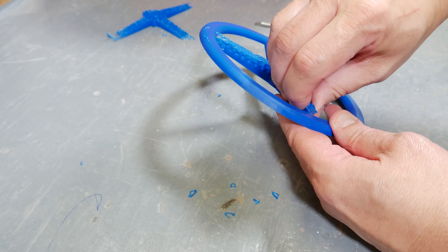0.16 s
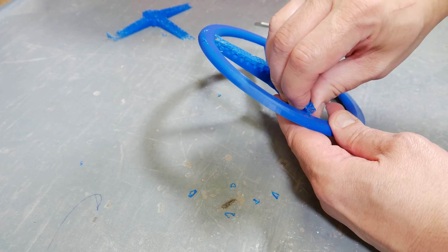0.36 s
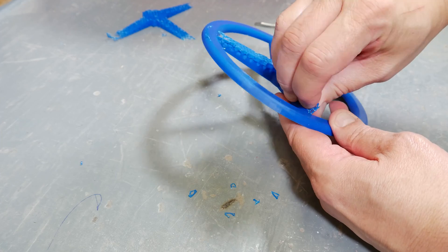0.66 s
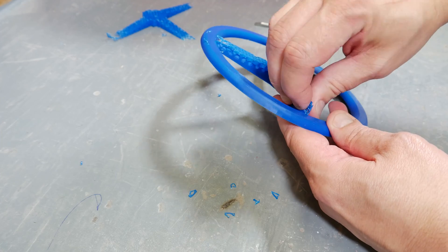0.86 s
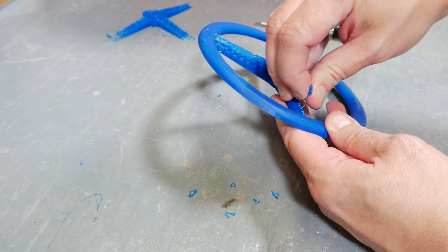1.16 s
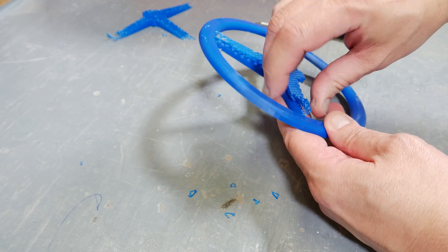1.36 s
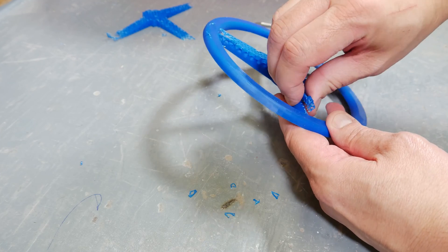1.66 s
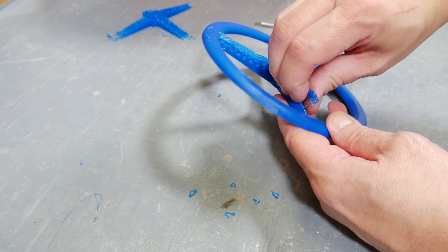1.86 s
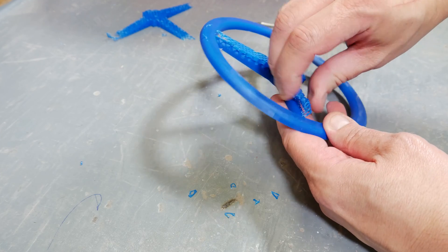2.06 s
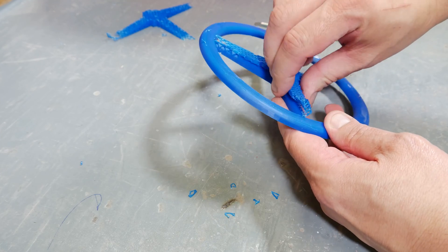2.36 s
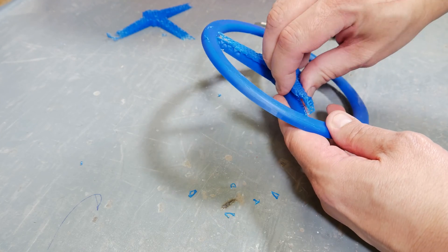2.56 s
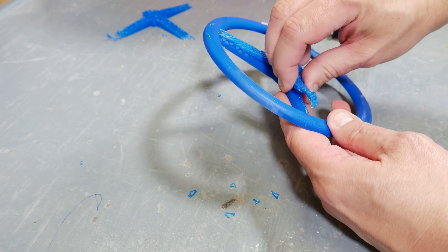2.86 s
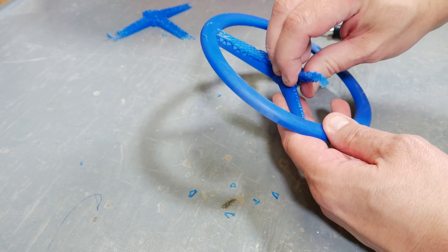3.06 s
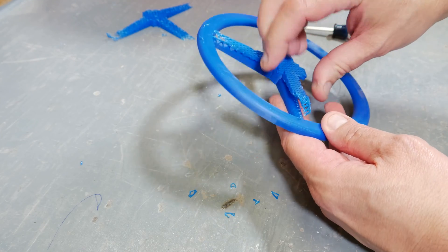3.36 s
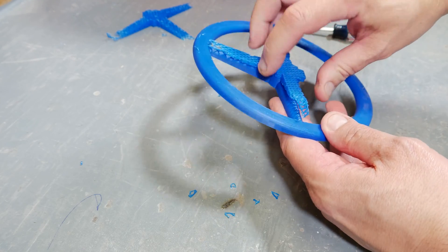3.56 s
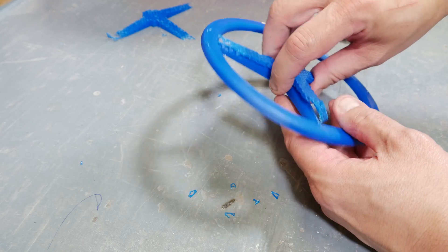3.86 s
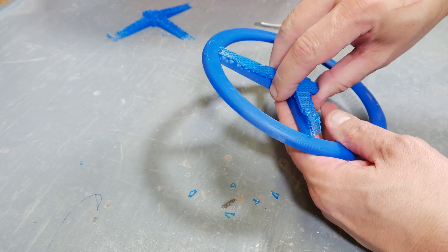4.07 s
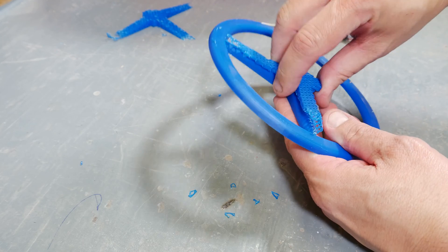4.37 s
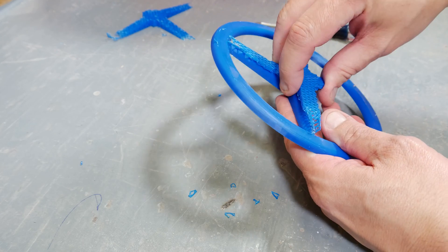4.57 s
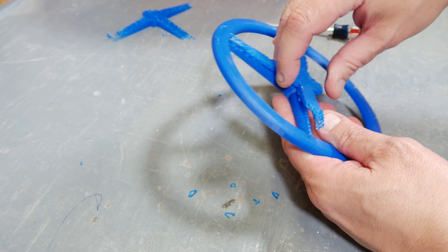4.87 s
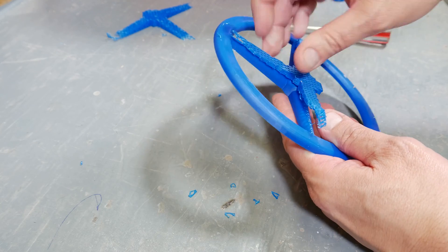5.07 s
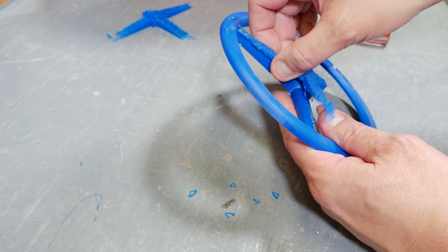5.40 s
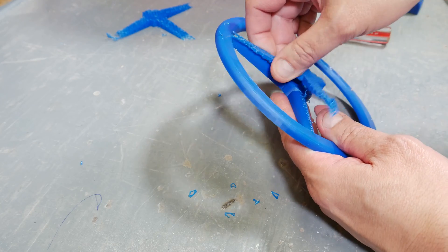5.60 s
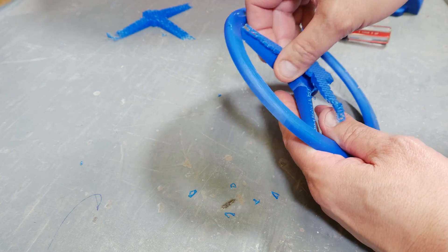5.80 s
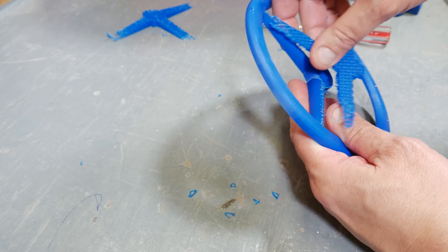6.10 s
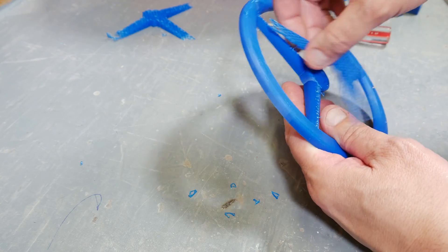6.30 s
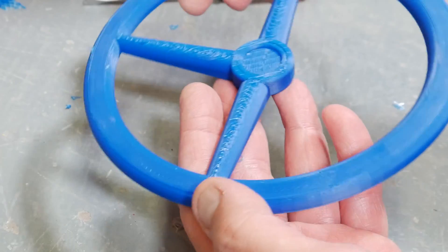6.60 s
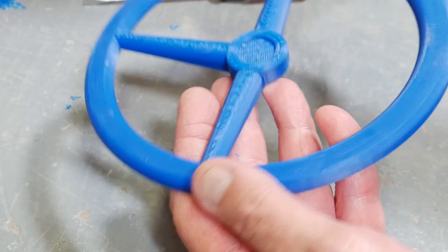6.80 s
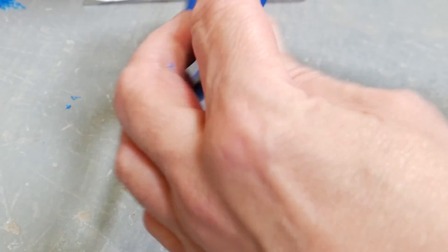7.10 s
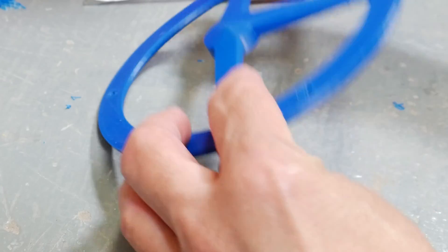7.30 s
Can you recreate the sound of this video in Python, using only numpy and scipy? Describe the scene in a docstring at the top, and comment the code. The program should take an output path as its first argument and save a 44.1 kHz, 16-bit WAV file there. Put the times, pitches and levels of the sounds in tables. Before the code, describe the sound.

A close microphone catches fingers prying printed plastic lattice from a light wheel. Irregular bright snaps and brief tearing crackles, each with a tiny plastic ring and soft thud in the hand, are separated by quiet handling. Densest bursts fall around three and four seconds. Last comes a loud clack on the bench and a few quick bounces, with short room echoes.

```python
"""Sharp cracks, singly and in bursts, as brittle printed lattice is pried off a small plastic wheel by hand.
Each crack is a quick run of tiny fractures that rings the broken strut and the wheel, with a soft thud in the hand.
Between them come nail clicks, faint ticks and rubbing fingers, made of shorter cracks and grainy noise.
At the end the wheel is put down on the bench with a knock and a short rattle: a clack plus decaying modes.
A brief dull bump opens the scene; low rumble, faint hums and hiss lie behind it, and a small workshop echoes."""
import sys
import numpy as np
from scipy import signal
from scipy.fft import rfft, irfft
from scipy.io import wavfile

SR = 44100
rng = np.random.default_rng(int(sys.argv[2]) if len(sys.argv) > 2 else 0)


def inscribe(sig):
    """Save sig as 16-bit PCM at rate SR to the path in sys.argv[1].

    A 1-D sig is mono; a 2-D sig holds one channel per row.
    Samples are clipped to [-1, 1] before scaling.
    """
    pcm = np.round(np.clip(np.atleast_2d(sig).T, -1, 1) * 32767)
    wavfile.write(sys.argv[1], SR, pcm.astype(np.int16))


N = 328359
TIME = np.arange(N) / SR

# Tone of the opening bump. Each row: frequency in Hz, relative level in dB.
BUMP_COLOUR = [(30, -12), (60, -15), (125, 8.5), (250, -18), (850, -12), (1300, -23), (2700, -15.5),
               (6000, -28.5), (15000, -43)]
# Slow swells of the rumble. Each row: time in seconds, level in dB before the overall trim.
RUMBLE_SWELLS = [(0.06, -70), (0.22, -73), (0.81, -66.5), (1.55, -70), (2.15, -67.5), (2.48, -72.5),
                 (6.84, -76.5), (7.2, -71)]
# Tone of the rumble. Each row: frequency in Hz, relative level in dB.
RUMBLE_COLOUR = [(25, -23), (40, -4), (55, -6.5), (90, -4.5), (125, 3.5), (160, -1.5), (210, -7.5),
                 (330, -7.5), (500, -19.5), (900, -21), (2000, -32)]
# Tone of the hiss. Each row: frequency in Hz, relative level in dB.
HISS_COLOUR = [(100, -1.5), (500, 0), (800, -2), (1300, -7), (3000, -11), (5500, -18.5), (9500, -22.5),
               (13000, -25), (16000, -48)]
# Faint hums that swell and fade.
# Each row: frequency in Hz, rms level at the height in dB, centre in seconds, Gaussian spread in seconds.
HUMS = [(116.4, -65, 0.91, 0.17), (395, -72.5, 0.98, 0.41), (352, -76.5, 6.17, 0.11)]
# A fingernail clicks over a ridge. Each row: start in seconds, relative level in dB, ring in Hz.
NAILS = [(0.249, -56.5, 5460), (0.8166, -51.5, 2270), (0.912, -47.5, 5460), (1.2808, -53.5, 5470),
         (1.428, -46.5, 3100), (4.3102, -52, 6040), (5.6754, -50, 3680), (6.9252, -46.5, 5360)]
# A strut snaps. Each row: start in seconds, relative level in dB, tearing time in ms,
# middle in dB against the treble (how hard the snap drives the wheel).
CRACKS = [(0.2973, -53, 2.2, -5.5), (.365, -42, 5.2, -10), (.386, -46.5, 2.5, 0), (.47, -59.5, 2.1, -8.5),
          (0.4975, -39.5, 2.9, -2.5), (.5919, -49, 2.1, -4.5), (.6335, -33.5, 6.3, -13),
          (0.6452, -33.5, 3.4, -6.5), (0.686, -43.5, 3, -14), (1.008, -44, 4.3, -3), (1.0392, -45, 3, -7.5),
          (1.0933, -62, 2, -15), (1.1533, -53.5, 3, -15), (1.213, -67, 1.6, -6), (1.3176, -53, 3.6, 0.5),
          (1.8666, -44, 1.85, -1), (1.8968, -46, 5.5, -9), (1.912, -33.5, 3.6, -7), (1.934, -37, 1.9, -14),
          (2.0026, -42, 2.6, -12.5), (2.037, -40, 3.3, -8), (2.6066, -60.5, 2.9, -7), (2.67, -56, 2, -16),
          (2.929, -63, 2.2, -10), (2.975, -45.5, 2, -9), (3.003, -48, 2.4, -10), (3.0113, -36, 3.1, -8),
          (3.0312, -33, 1.8, -9.5), (3.0575, -38.5, 1.6, -4), (3.0688, -31, 3.7, -5.5),
          (3.0869, -33.5, 1.7, -8), (3.116, -35, 6.3, -17), (3.1258, -32.5, 1.8, -16),
          (3.1485, -43, 1.2, -13), (3.1795, -50.5, .6, -6), (3.2198, -49, 0.56, -11),
          (3.8174, -59.5, 1.5, 4), (4.1397, -31.5, 3, -1.5), (4.1534, -28.5, 0.9, 3.5),
          (4.1605, -30.5, 1.4, -3), (4.169, -32, 4.6, -12.5), (4.2572, -49.5, 2.4, -16),
          (4.4188, -61, 1.7, -4), (4.4623, -52, 1.4, -12.5), (4.5421, -54.5, 1.7, -3),
          (4.577, -41, 0.64, 3), (4.5942, -39, 3.43, -16), (4.7473, -61, 5, -2), (4.763, -36, 5.6, -0.5),
          (4.774, -33.5, 3, -2.5), (4.8558, -56, 4.7, 1), (5.2189, -57, 2.3, 0), (5.4681, -36, 3, -3.5),
          (5.523, -38.5, 2, 0), (5.553, -47.5, 0.7, -4), (5.6122, -56, .5, -6.5), (5.7946, -57.5, 2.3, 0),
          (5.926, -65, 1.7, -7), (6.0639, -49.5, 1.8, -0.5), (6.1744, -53.5, 1.5, -7.5),
          (6.335, -48, 2.8, -4), (6.357, -49, 1.3, -1), (6.373, -47.5, 2.6, -4)]
# Corner frequencies of a crack's tone: bass, middle, treble and top, in Hz.
CRACK_CORNERS_HZ = [700, 2600, 7000, 13000]
# The colour of the cracks shifts as the hands work along the wheel.
# Each row: time in seconds, base level of the bass in dB, base level of the top in dB, both against the treble.
CRACK_COLOUR = [(.5, -5, -1.5), (1.3, -10, -6.5), (2, -17.5, -2.5), (3.1, -24.5, -4), (4.4, -14, -6),
                (5.5, -14, -2.5), (6.4, -12.5, -4.5)]
# Modes of the hand-damped wheel when a strut lets go. Each row: centre frequency in Hz, relative level in dB.
WHEEL = [(850, -0.5), (1850, -3.5), (2050, -36.5), (2430, 3.5), (2560, -13), (3080, -22), (3830, 6),
         (5830, 1), (6210, -3.5), (6960, 1), (8310, 1.5), (9650, -1), (10400, 0.5)]
# Blunt contacts of wheel, hand and bench.
# Each row: start in seconds, level in dB, contact cut-off in Hz, weight in the bench from 0 to 1.
KNOCKS = [(0.8708, -59, 1350, 0.57), (7.048, -57.5, 600, 0.51), (7.2718, -19.5, 3980, 1),
          (7.2754, -35, 990, 1), (7.3138, -38.5, 2900, 0.44), (7.341, -38, 360, 0.66),
          (7.348, -49, 4420, 0.44), (7.387, -61.5, 796, 0.28)]
# Modes of the wheel against the bench.
# Each row: frequency in Hz, relative level in dB, 60 dB decay in seconds before the grip's damping.
BENCH = [(140, 3.5, 0.11), (153, 2, 0.15), (258, -5.5, 0.052), (309, 3.5, 0.077), (342, -3, 0.097),
         (396, -6.5, 0.12), (511, -6.5, 0.1), (554, -3.5, 0.058), (674, -8.5, 0.094), (787, -10.5, 0.072),
         (843, -9.5, 0.26), (1110, -16, 0.15), (1547, -10, 0.15), (1863, -14.5, 0.065), (1930, -11, 0.15),
         (2030, -16, 0.2), (2360, -14, 0.027), (2455, 5, 0.083), (2800, -24, 0.066), (3160, -5, 0.08)]
# Tone of the clack in a knock. Each row: frequency in Hz, relative level in dB.
KNOCK_COLOUR = [(110, -13), (200, -2), (290, 6.5), (800, -0.5), (1100, -7), (1500, -13.5), (1900, 0),
                (3000, -5.5), (4200, -7), (6000, -5.5), (10000, -3.5), (15000, -5)]
# Strokes of the fingers over the plastic.
# Each row: centre in seconds, half length in seconds (power down to 1/e), relative level in dB.
RUBS = [(1.429, 0.037, -66), (1.76, 0.056, -73.5), (2.094, 0.036, -65), (2.218, 0.0084, -62),
        (2.403, 0.021, -68.5), (3.267, 0.039, -68), (3.685, 0.08, -71.5), (3.964, 0.07, -73),
        (4.391, 0.0097, -69), (5.011, 0.019, -68.5), (5.226, 0.17, -76), (5.433, .053, -68.5),
        (6.151, 0.45, -75.5), (6.508, 0.053, -72.5), (6.915, 0.077, -69.5), (7.036, 0.02, -64.5),
        (7.173, 0.08, -71)]
# Tone of the rubbing. Each row: frequency in Hz, relative level in dB.
RUB_COLOUR = [(200, -10), (700, -2.5), (1500, -4), (3000, -3), (6000, -4.5), (10000, -5), (15000, -15)]
# How long the room rings. Each row: frequency in Hz, 60 dB decay in seconds.
ROOM_T60 = [(150, 0.12), (800, 0.21), (2000, 0.18), (6000, 0.18), (10000, 0.17), (15000, 0.081)]

WHEEL_DB, WHEEL_T60_S = -36, .03
STRUT_T60_S = .012
# the struts differ in length, so each rings at a pitch of its own: centre and reach either way
STRUT_HZ, STRUT_SPREAD_OCTAVES = 7870, 0.2
# a harder snap gains less in the bass than in the treble
USUAL_CRACK_DB, BASS_LOSS_PER_DB = -45, .25
# a snap that drives the wheel hard has more bass as well
USUAL_MIDDLE_DB, BASS_FOLLOWS_MIDDLE = -3.5, .45
TOP_DB_PER_DOUBLING = 1   # of the tearing time, from 1 ms: longer tears fizz more
# the wheel jerks in the hand, in step with the force of a snap: median pitch, decay, level below the snap
RECOIL_HZ, RECOIL_T60_S, RECOIL_DB = 149, 0.05, -26
GRIP_LOSS_DB_PER_S = 110   # the hand that sets the wheel down damps its ringing
CUTOFF_HZ = 15900


def from_db(db):
    """Decibels to amplitude."""
    return 10 ** (np.asarray(db) / 20)


def rms_one(x):
    """Scale a sound to rms 1."""
    return x / np.sqrt(np.mean(x ** 2) + 1e-20)


def attack_one(x, size=265):
    """Scale a blow so that its first six milliseconds have rms 1."""
    return x / np.sqrt(np.mean(x[:size] ** 2) + 1e-20)


def at_hz(points, hz):
    """Read a spectrum on a log-frequency axis."""
    points = np.array(points)
    return np.interp(np.log(np.maximum(hz, 1)), np.log(points[:, 0]), points[:, 1])


def colour(x, points, size=2048):
    """Causal (minimum-phase) filter with the given spectrum, made by folding its cepstrum."""
    gain = from_db(at_hz(points, np.fft.rfftfreq(size, 1 / SR)))
    cepstrum = irfft(np.log(gain))
    cepstrum[1:size // 2] *= 2
    cepstrum[size // 2 + 1:] = 0
    response = irfft(np.exp(rfft(cepstrum)))
    return signal.fftconvolve(x, response)[:len(x)]


def butter(x, order, hz, kind):
    """Butterworth filter, "high" or "low" pass."""
    return signal.sosfilt(signal.butter(order, hz, kind, fs=SR, output="sos"), x)


def add(track, s, sound):
    """Mix a sound in at time s."""
    start = max(round(s * SR), 0)
    track[..., start:start + sound.shape[-1]] += sound[..., :N - start]


def ringing(modes, t, spread_db):
    """Decaying sines; every blow meets the modes with random signs and, given a spread, other strengths."""
    hz, db, t60 = np.array(modes).T[:, :, None]
    strength = from_db(db + spread_db * rng.standard_normal(hz.shape))
    strength = strength * rng.choice([-1, 1], hz.shape)
    return np.sum(strength * from_db(-60 * t / t60) * np.sin(2 * np.pi * hz * t), axis=0)


def scatter(t, decay_s):
    """Crowded modes, too many to tell apart: a hiss with a smoothed spectrum that dies away; energy 1."""
    spectrum = rfft(rng.standard_normal(len(t)) * np.exp(-t / decay_s))
    evened = irfft(spectrum / np.sqrt(np.abs(spectrum) + 1e-9), len(t))
    evened = evened * np.exp(-t / decay_s / 10)
    return evened / np.linalg.norm(evened)


def stereo_noise(points, side_db):
    """Coloured noise: a part shared by both channels and a part of opposite sign in each."""
    mid, side = (rms_one(colour(rng.standard_normal(N), points, size=8192)) for _ in range(2))
    return mid + from_db(side_db) * side * [[1], [-1]]


def bump(level_db=-40, end_s=0.0203):
    """A brief dull bump: low-heavy noise that stops short."""
    gate = np.clip((end_s - TIME) / 0.0011, 0, 1)
    thud = gate * stereo_noise(BUMP_COLOUR, side_db=-10)
    return from_db(level_db) * butter(thud, 2, 60, "high")


def background(rumble_db=2.5, hiss_db=-76):
    """Low rumble with faint hums that waver in phase, and the hiss of still air."""
    rumble_level = from_db(np.interp(TIME, *np.transpose(RUMBLE_SWELLS)) + rumble_db)
    rumble = rumble_level * stereo_noise(RUMBLE_COLOUR, side_db=-4.0)
    hums = 0
    for hz, db, s, spread_s in HUMS:
        waver = np.cumsum(rng.standard_normal(N)) * 0.014
        swell = np.exp(-((TIME - s) / spread_s) ** 2 / 2)
        hums = hums + np.sqrt(2) * from_db(db) * swell * np.sin(2 * np.pi * hz * TIME + waver)
    return rumble + hums + from_db(hiss_db) * stereo_noise(HISS_COLOUR, side_db=3.0)


def crack(tear_ms, ring_hz, bass_db, middle_db, top_db, fractures_per_s=2200, follow=0.32, body_s=0.0015,
          strut_db=-26, dip_db=-4, swell=0.41, size=3072):
    """One strut snaps and tears its neighbours. Returns the sound ahead and the sound sent all round."""
    t = np.arange(size) / SR
    progress = 1000 * t / tear_ms
    tearing = follow * np.exp(-(progress / 2) ** 2) * (1 - np.exp(-progress / swell))
    fractures = (rng.random(size) < fractures_per_s / SR) * rng.standard_normal(size) * tearing
    fractures[0] = 1 / (1 + tear_ms / 2)   # a long tear starts gently, a clean break at once
    strut = from_db(strut_db - 60 * t / STRUT_T60_S) * np.sin(2 * np.pi * ring_hz * t)
    # the grip and the shrinking lattice shift the modes from crack to crack
    modes = [(hz * rng.normal(1, .03), db + WHEEL_DB, WHEEL_T60_S) for hz, db in WHEEL]
    body = scatter(t, body_s) + strut + ringing(modes, t, spread_db=3.0)
    bass, middle, treble, top = CRACK_CORNERS_HZ
    # small parts radiate poorly in the bass
    tilt = [(100, bass_db - 6.0), (bass, bass_db), (1350, (bass_db + middle_db) / 2 + dip_db),
            (1900, middle_db - 2.5), (middle, middle_db), (3700, middle_db - .3),
            (4900, middle_db / 2 - 0.5), (treble, 0), (8400, -1.8), (10000, top_db / 4 - .4), (top, top_db)]
    ahead = attack_one(colour(signal.fftconvolve(fractures, body)[:size], tilt))
    # summed over all directions, the peaks and notches even out
    around = colour(scatter(t, body_s + tear_ms / 4000), tilt)
    return np.array([ahead, around * np.linalg.norm(ahead) / np.linalg.norm(around)])


def crumbs(faintest_db=-76, range_db=9, until_s=6.0, count=70):
    """Loose strands tick faintly under the fingers: very short cracks at random times and pitches."""
    out = np.zeros((2, N))
    for when, size, pitch in rng.random((count, 3)):
        tick = crack(.3, 4000 + 6000 * pitch, -16, -5, -8)
        add(out, when * until_s, from_db(faintest_db + range_db * size ** 2) * tick)
    return out


def nails(level_db=-13, strut_db=-17, bass_db=0, middle_db=0, top_db=-20):
    """A nail on a ridge: short dull clicks with a brief ping, voiced as cracks with little top."""
    out = np.zeros((2, N))
    for s, db, ring_hz in NAILS:
        click = crack(0.85, ring_hz, bass_db, middle_db, top_db, strut_db=strut_db)
        add(out, s, from_db(db + level_db) * click)
    return out


def lattice(level_db=1.58):
    """The cracks, one after another; force, tearing time and grip set the colour of each."""
    out = np.zeros((2, N))
    times, bass, top = np.transpose(CRACK_COLOUR)
    rings_hz = STRUT_HZ * 2 ** (STRUT_SPREAD_OCTAVES * rng.uniform(-1, 1, len(CRACKS)))
    for (s, db, tear_ms, middle_db), ring_hz in zip(CRACKS, rings_hz):
        bass_db = (np.interp(s, times, bass) - BASS_LOSS_PER_DB * (db - USUAL_CRACK_DB)
                   + BASS_FOLLOWS_MIDDLE * (middle_db - USUAL_MIDDLE_DB))
        top_db = np.interp(s, times, top) + TOP_DB_PER_DOUBLING * np.log2(tear_ms)
        add(out, s, from_db(db + level_db) * crack(tear_ms, ring_hz, bass_db, middle_db, top_db))
    return out


def recoil(size=6144):
    """Every snap sets the hand-held wheel thudding softly: one low decaying sine of varying pitch."""
    out, t = np.zeros(N), np.arange(size) / SR
    for s, db, *_ in CRACKS:
        thud_hz = RECOIL_HZ * rng.lognormal(0, 0.24)
        add(out, s, ringing([(thud_hz, db + RECOIL_DB, RECOIL_T60_S)], t, spread_db=1.5))
    return out


def knocks(clack_s=0.0056, modes_db=-39.0, lowest_hz=112, size=12288):
    """Each contact gives a clack and rings the modes; a soft one is duller, a light one has less bass."""
    out, t = np.zeros(N), np.arange(size) / SR
    for s, db, cut_hz, weight in KNOCKS:
        clack = colour(scatter(t, clack_s), KNOCK_COLOUR)
        modes = from_db(modes_db - GRIP_LOSS_DB_PER_S * t) * ringing(BENCH, t, spread_db=0.0)
        blow = butter(clack + modes, 3, lowest_hz / np.clip(weight, .1, 1) ** 2, "high")
        blow = butter(blow, 2, min(cut_hz, SR / 3), "low")
        add(out, s, from_db(db) * attack_one(blow))
    return out


def fingers(grain_db=4.5, level_db=-1, catch_db=3, count=900):
    """Skin catches and slides over the printed ridges: an uneven, grainy rub."""
    power = sum(from_db(db + level_db) ** 2 * np.exp(-((TIME - s) / width) ** 2) for s, width, db in RUBS)
    catching = np.interp(TIME, np.linspace(0, TIME[-1], count), rng.standard_normal(count))
    noise = rng.standard_normal(N)
    graininess_db = grain_db * np.minimum(rng.exponential(1, N), 5) + catch_db * catching
    return np.sqrt(power) * rms_one(colour(noise * from_db(graininess_db), RUB_COLOUR))


def workshop(x, tail_db, side_db, near_db, near_s=0.0055, build_s=0.0036, size=16384):
    """Echoes only: close reflections off hands and bench, then a short diffuse tail, briefest in the top treble."""
    t, hz = np.arange(size) / SR, np.fft.rfftfreq(size, 1 / SR)
    white, tail = rfft(rng.standard_normal((2, size))), 0
    edges = np.append(0, np.geomspace(250, SR / 2, 10))
    for low, high in zip(edges, edges[1:]):
        band = irfft(white * (hz >= low) * (hz < high))
        tail = tail + band * from_db(-60 * t / at_hz(ROOM_T60, (low + high) / 2))
    tail = tail * (1 - np.exp(-(t / build_s) ** 2))
    mid, side = from_db(tail_db) * tail / np.linalg.norm(tail, axis=1, keepdims=True)
    side = from_db(side_db) * side + from_db(near_db) * scatter(t, near_s)
    # long waves reach both channels nearly alike
    side = butter(side, 1, 250, "high")
    return signal.fftconvolve(x[None], mid + side * [[1], [-1]], axes=1)[:, :N]


def scene():
    """Hand work and bench knocks in the room, over the background."""
    ahead, around = lattice() + nails() + crumbs() + fingers()
    bench = knocks()
    hand_echoes = workshop(around, tail_db=-7.5, side_db=-7.5, near_db=-11.5)
    bench_echoes = workshop(bench, tail_db=-7.5, side_db=-8.5, near_db=-9)
    return ahead + recoil() + bench + hand_echoes + bench_echoes + bump() + background()


def record(dry):
    """The highest treble is softened, and the top is cut steeply."""
    softened = butter(dry, 3, 13800, "low")
    return signal.sosfilt(signal.ellip(10, .1, 80, CUTOFF_HZ, fs=SR, output="sos"), softened)


dry = scene()
out = record(dry)
inscribe(out)
```